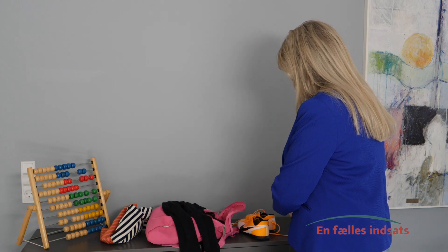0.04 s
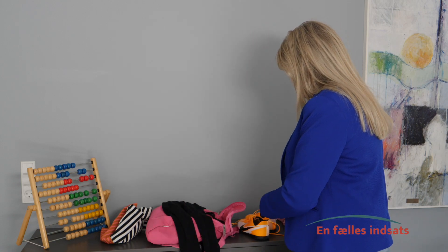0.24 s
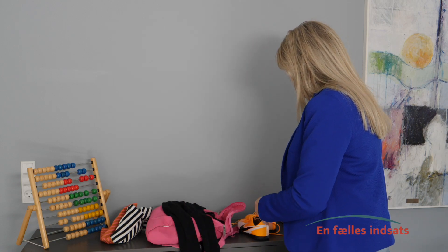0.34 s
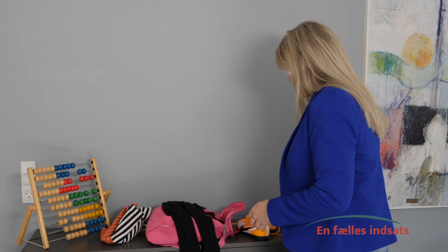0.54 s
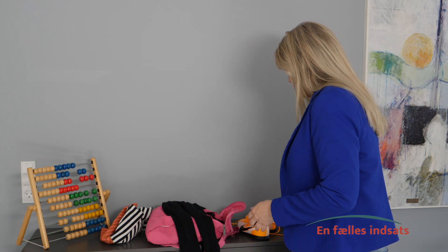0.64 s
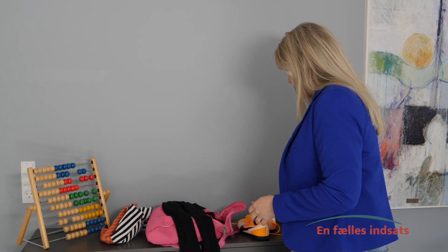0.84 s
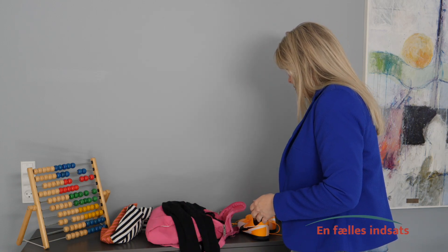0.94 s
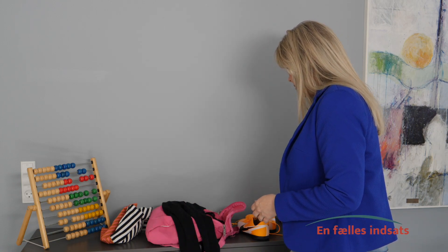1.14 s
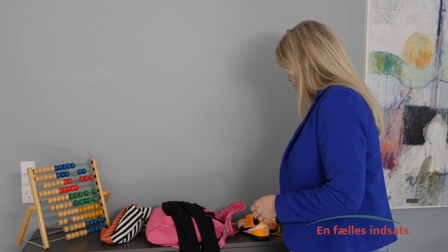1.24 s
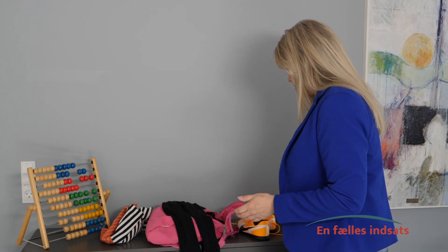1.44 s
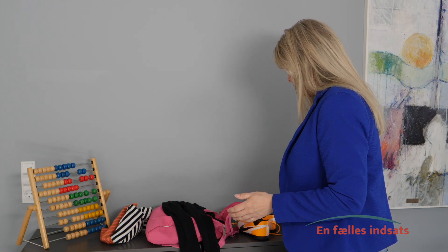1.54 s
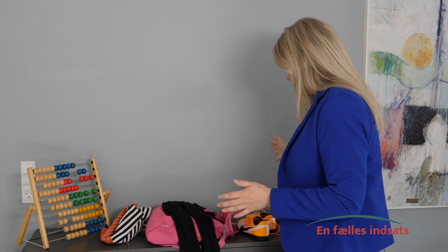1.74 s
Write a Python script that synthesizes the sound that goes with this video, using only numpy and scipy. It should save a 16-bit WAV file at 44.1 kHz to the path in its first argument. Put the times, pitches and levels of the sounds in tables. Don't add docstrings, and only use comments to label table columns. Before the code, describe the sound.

A hard knock of a small object set on a tabletop, then a soft thump and faint click

```python
import sys
import numpy as np
from scipy import signal
from scipy.io import wavfile
from scipy.ndimage import uniform_filter1d

SR = 44100
rng = np.random.default_rng(int(sys.argv[2]) if len(sys.argv) > 2 else 0)


def materialize(psi):
    bounded = np.clip(np.atleast_2d(psi).T, -1, 1)
    quanta = np.round(bounded * 32767).astype(np.int16)
    wavfile.write(sys.argv[1], SR, quanta)


def natural_amplitude(level_db):
    exponent = np.asarray(level_db, float) / 20
    return 10 ** exponent


N = 79380
T = np.arange(N) / SR


def level(x, db):
    return x * natural_amplitude(db) / np.sqrt(np.mean(x ** 2))


def soften(x, hz, kind="lowpass", order=1):
    return signal.sosfilt(signal.butter(order, hz, kind, fs=SR, output="sos"), x)


def band(x, hz, octaves):
    edges = np.clip([hz * 2 ** (-octaves / 2), hz * 2 ** (octaves / 2)], 10, 0.47 * SR)
    return soften(x, edges, "bandpass", order=2)


def walk(rate):
    hold = int(SR / rate)
    steps = np.repeat(rng.standard_normal(N // hold + 1), hold)
    return 1.77 * uniform_filter1d(uniform_filter1d(steps, hold), hold)[:N]


def swell(peak, attack, t60):
    rise = np.sin(np.pi / 2 * np.clip((T - peak) / max(attack, 1e-3) + 1, 0, 1)) ** 2
    return rise * natural_amplitude(-60 * np.maximum(T - peak, 0) / max(t60, 1e-2))


def ring(start, modes, share=1.0):
    ring_s, luck_db, detune = 0.2, 2.93, 0.008
    first = int(start * SR) + 1
    t = T[first:first + int(ring_s * SR)] - start
    tones = np.zeros(len(t))
    luck = rng.standard_normal((len(modes), 2))
    for k, ((hz, db, t60), (gain_luck, pitch_luck)) in enumerate(zip(modes, luck)):
        phase_flip = (-1) ** k
        strength = natural_amplitude(db + luck_db * gain_luck - 60 * t / t60)
        pitch = share * hz * (1 + detune * pitch_luck)
        tones += phase_flip * strength * np.sin(2 * np.pi * pitch * t)
    out = np.zeros(N)
    out[first:first + len(t)] = tones / 3
    return out


# (t/s, level/dB, contact/ms, pitch share)
CONTACTS = [(0.1698, -40, 1.94, 1.01), (.179, -44, 0.95, 1.18), (.200, -35.5, 0.93, 0.87),
            (0.227, -35, 0.72, 0.62), (0.2371, -23.5, 0.85, 0.96), (.2478, -13, .55, 1.),
            (.264, -35, 0.53, 1.01), (0.276, -26.5, 1.22, 0.89), (.301, -29.5, 0.93, 0.86),
            (0.911, -36, 0.53, 1.14), (.915, -30.5, 0.92, 1.116), (0.935, -42.5, 1.9, 0.92),
            (0.948, -19.5, 2.43, 1.6), (1.045, -43, 0.4, 0.6), (1.423, -55, 0.25, 1.17),
            (1.4313, -54, 0.2, 1.1), (1.441, -54.5, .4, 1.13)]
BODY_PITCHES = [200, 250, 332, 412, 510, 586, 678, 775, 895, 985, 1140, 1330, 1710]
# (level/dB, t60/s)
BODY_FADES = [(0, 0.053), (0, 0.14), (1.5, 0.084), (-2, 0.1), (-12, 0.081), (-1, 0.093), (-3, 0.067),
              (-5.5, 0.096), (1.5, 0.096), (-10, 0.044), (-13.5, .05), (-6, 0.023), (-16, 0.12)]


def knocks():
    modes = [(hz, db, t60) for hz, (db, t60) in zip(BODY_PITCHES, BODY_FADES)]
    out = 0
    for start, db, contact_ms, share in CONTACTS:
        push = np.sin(np.pi * np.linspace(0, 1, int(max(contact_ms, 0.1) * SR / 1000) + 3))
        out = out + natural_amplitude(db) * signal.lfilter(push / push.sum(), 1, ring(start, modes, share))
    return out


# (t/s, level/dB, pitch share)
EDGE_TICKS = [(.045, -69, 0.75), (.077, -57, 0.32), (.114, -48, 0.62), (.171, -57, 0.84),
              (.2461, -25, 1.004), (.2495, -27, 1.05), (.253, -35, 0.91), (.602, -48.5, 0.55),
              (.9105, -35.5, 0.538), (1.423, -40.5, 0.59), (1.4265, -47.5, 0.98), (1.433, -48.5, 1.3),
              (1.386, -52, 0.45)]
# (f/Hz, level/dB, t60/s)
SHELL_TONES = [(2000, -8, 0.0051), (2830, 3, 0.008), (3635, 5.5, 0.0084), (4570, 1, 0.0093),
               (5470, -5.5, 0.0069), (6990, -7.5, 0.0084), (8740, -18, 0.0096), (12450, -18, 0.022)]


def ticks():
    sharp = sum(natural_amplitude(db) * ring(start, SHELL_TONES, share) for start, db, share in EDGE_TICKS)
    return soften(sharp, 9300)


# (peak t/s, level/dB, f/Hz, swell/s, t60/s)
BOARD_SWAYS = [(.195, -35.5, 91, 0.013, 0.098), (0.2605, -20, 94.4, 0.022, 0.092),
               (0.2705, -26.5, 68.5, 0.043, 0.19), (0.298, -29, 147.6, 0.045, 0.17),
               (.313, -34, 73.4, 0.017, 0.33), (0.364, -32, 91, 0.013, 0.088),
               (0.401, -42, 128, 0.018, 0.11), (0.9372, -25.5, 95.6, 0.041, 0.036),
               (0.9498, -24, 72.6, 0.032, 0.16), (.979, -32, 64.4, 0.014, 0.069),
               (0.9477, -31, 148, 0.033, 0.036), (.978, -34.5, 145, 0.013, 0.11),
               (1.012, -38.5, 125, 0.018, 0.14), (1.042, -37, 65, 0.038, 0.14),
               (1.13, -44, 61.3, 0.019, .25), (1.456, -43, 79.5, 0.063, 0.15),
               (.46, -51, 127.5, 0.022, 0.16), (.66, -49.5, 55.6, 0.096, 0.28)]
# (start t/s, end t/s, level/dB, f/Hz)
LOOSE_HUMS = [
    (.98, 1.092, -42.5, 195),
    (1.05, 1.11, -40, 99),
    (.99, 1.09, -52, 285),
    (1.04, 1.11, -56, 385),
]


def table():
    edge_s = 0.03
    out = 0
    for peak, db, hz, attack, t60 in BOARD_SWAYS:
        out = out + natural_amplitude(db) * swell(peak, attack, t60) * np.cos(2 * np.pi * hz * (T - peak))
    for start, end, db, hz in LOOSE_HUMS:
        gate = np.clip(np.minimum(T - start, end - T) / edge_s + 0.5, 0, 1)
        strength = natural_amplitude(db + 3.6 * walk(60.2))
        cycles = hz * np.cumsum(1 + 0.017 * walk(29.9)) / SR
        out = out + strength * gate * np.sin(2 * np.pi * cycles)
    return out


# (peak t/s, level/dB, attack/s, t60/s, corner f/Hz)
CLOTH_RUSTLES = [(.0, -63, .01, 0.66, 4030), (.08, -59.5, 0.079, 0.22, 3050), (0.171, -58, .003, 0.5, 2000),
                 (0.207, -52.5, 0.021, 0.21, 2310), (0.244, -36.5, 0.031, 0.19, 1110),
                 (0.268, -40.5, 0.045, 0.37, 696), (0.548, -71, 0.33, 1, 3010),
                 (0.911, -42, 0.019, 0.092, 1530), (0.933, -45.5, 0.02, 0.37, 670),
                 (1.391, -61.5, 0.051, 0.5, 2000), (1.427, -53.5, .006, 0.11, 1510)]


def rustles():
    grain_db = 1.5
    out = 0
    for peak, db, attack, t60, corner_hz in CLOTH_RUSTLES:
        grain = rng.standard_normal(N) * natural_amplitude(grain_db * walk(400))
        dull = soften(soften(grain, corner_hz), corner_hz)
        rub = soften(dull, 300, "highpass")
        out = out + level(rub, db) * swell(peak, attack, t60)
    return out


# (f/Hz, t60/s)
ROOM_FADES = [(80, 0.45), (300, 0.42), (900, 0.24), (2500, 0.2), (5000, 0.4), (11000, 0.099)]


def room(x):
    wet_db, wet_low_db, first_echo_s = -7, -6, 0.006
    room_hz, room_t60 = np.transpose(ROOM_FADES)
    t = T[:SR // 2 + SR // 4]
    tail = 0
    for hz in 62.5 * 2.0 ** np.arange(9):
        t60 = np.interp(np.log(hz), np.log(room_hz), room_t60)
        part = band(rng.standard_normal(len(t)), hz, 1) * natural_amplitude(-60 * t / t60) * (t > first_echo_s)
        even = np.sqrt(hz / SR / np.sum(part ** 2))
        tail = tail + part * even * natural_amplitude(wet_low_db if hz < 200 else wet_db)
    return signal.fftconvolve(x, tail)[:N]


# (f/Hz, level/dB per band)
AIR_COLOUR = [(15, -31), (25, 1), (67, -2.5), (122, -7), (180, -12.5), (553, -28), (711, -19.5),
              (2140, -38), (6000, -45.5), (7800, -69), (13200, -120)]


def air():
    air_hz, air_db = np.transpose(AIR_COLOUR)
    out = 0
    for hz in 28 * 2 ** np.arange(0, 8, 0.5):
        db = np.interp(np.log(hz), np.log(air_hz), air_db) + 1.2 * walk(6)
        out = out + natural_amplitude(db) * band(rng.standard_normal(N), hz, 0.47)
    return level(out, -56)


def scene():
    board_send_db = -13
    things = knocks() + ticks() + rustles()
    board = table()
    echo = room(things + natural_amplitude(board_send_db) * board)
    return np.tile(things + board + echo + air(), (2, 1))


def low_pass(x):
    return signal.sosfilt(signal.butter(12, 15630, fs=SR, output="sos"), x)


def record(dry):
    mismatch_db, top_hz = -52, 15650
    sign = np.array([[1], [-1]])
    shared_hiss = level(soften(rng.standard_normal(N), 3300, "highpass"), -74)
    side_hiss = level(soften(rng.standard_normal(N), 19, "highpass"), -74.5)
    heard = soften(dry, 41.7, "highpass", order=2) * (1 + natural_amplitude(mismatch_db) * sign)
    mix = heard + shared_hiss + side_hiss * sign
    mix = signal.sosfilt(signal.ellip(10, 0.2, 80, top_hz, fs=SR, output="sos"), mix)
    return low_pass(mix)


dry = scene()
out = record(dry)
materialize(out)
```